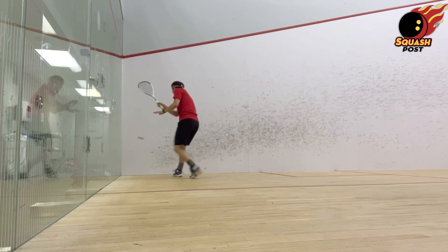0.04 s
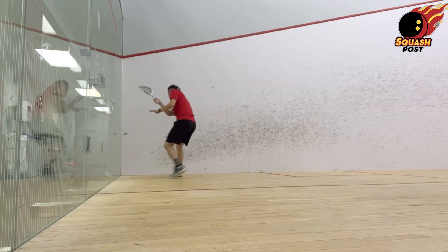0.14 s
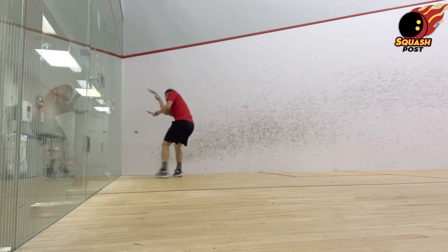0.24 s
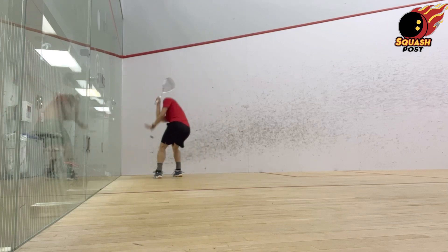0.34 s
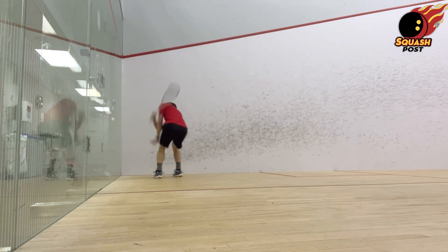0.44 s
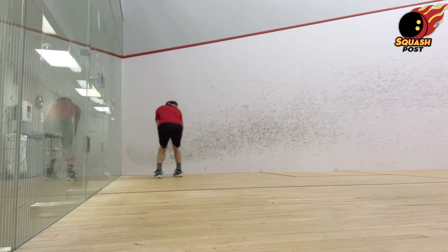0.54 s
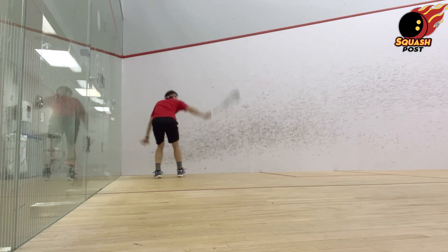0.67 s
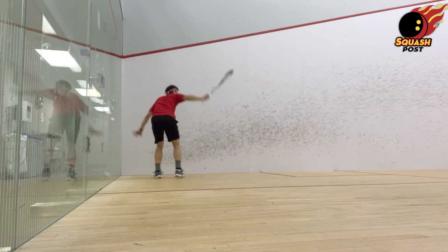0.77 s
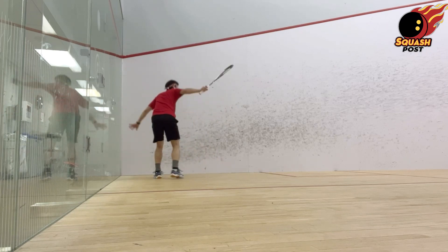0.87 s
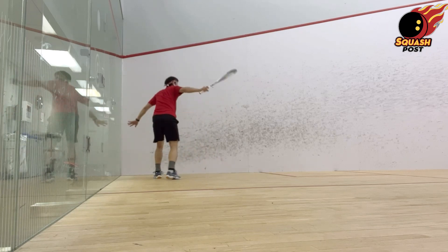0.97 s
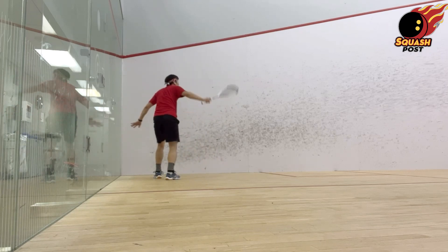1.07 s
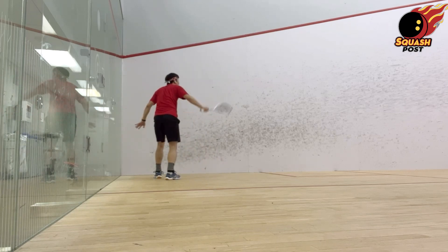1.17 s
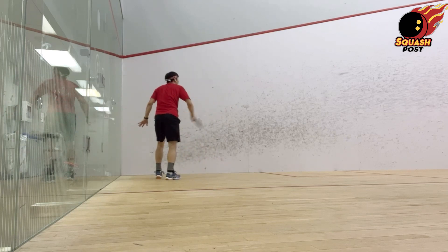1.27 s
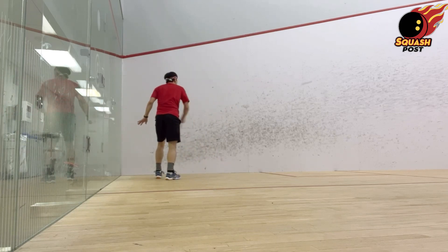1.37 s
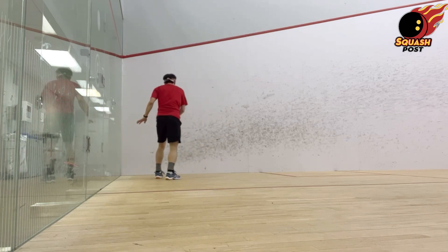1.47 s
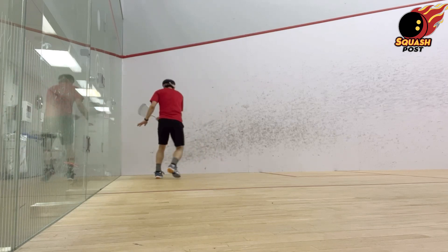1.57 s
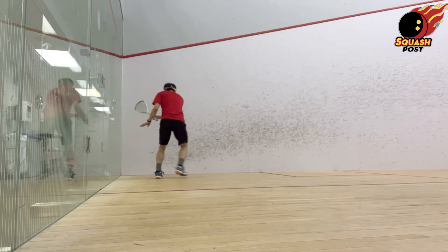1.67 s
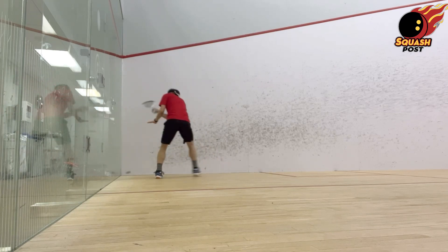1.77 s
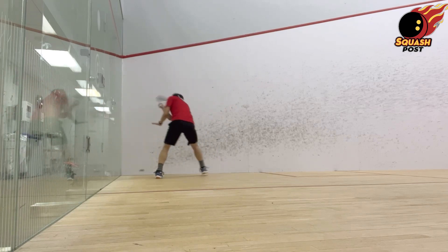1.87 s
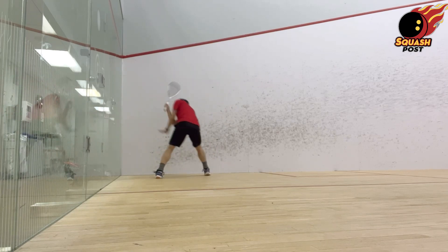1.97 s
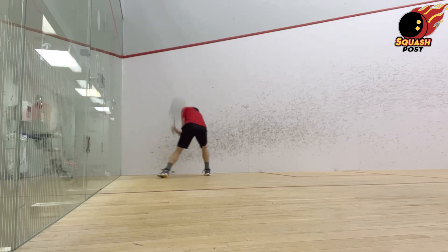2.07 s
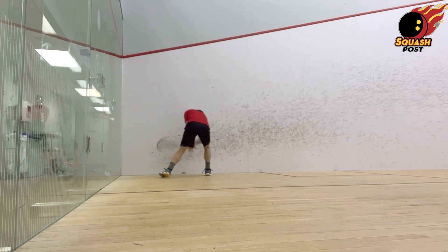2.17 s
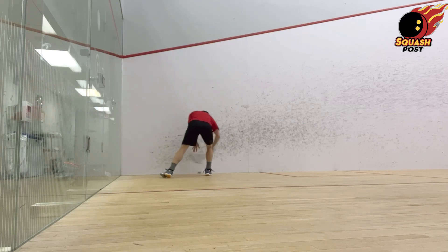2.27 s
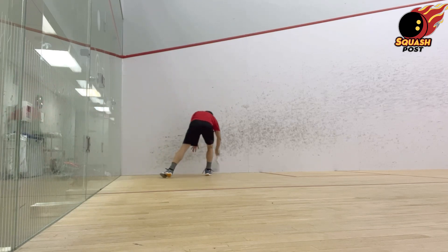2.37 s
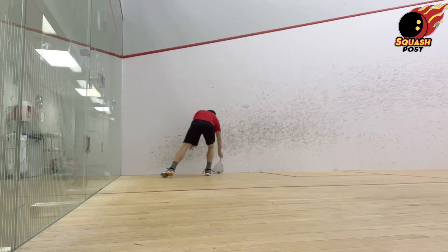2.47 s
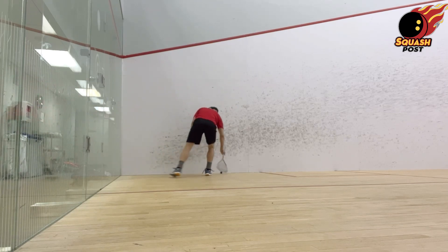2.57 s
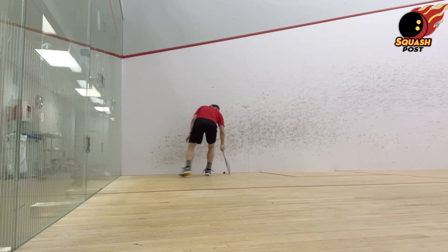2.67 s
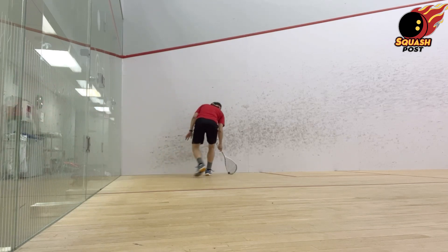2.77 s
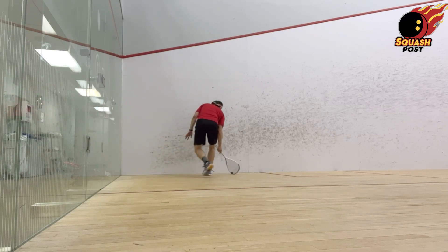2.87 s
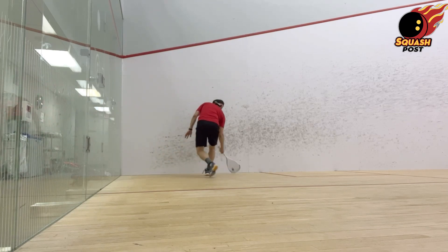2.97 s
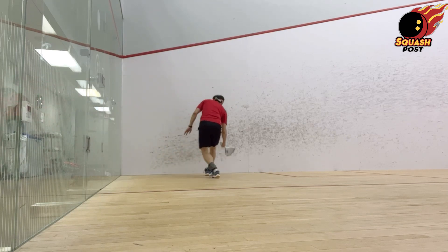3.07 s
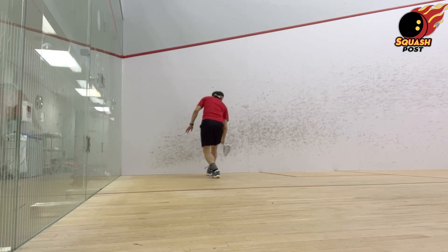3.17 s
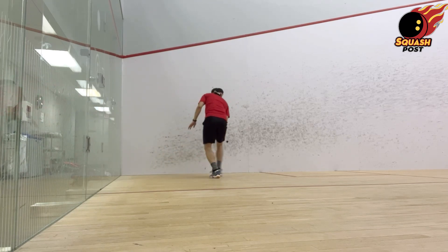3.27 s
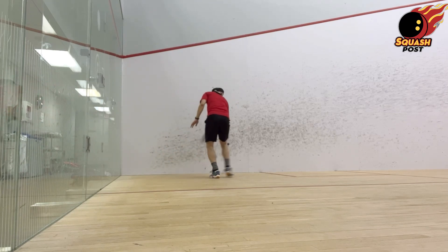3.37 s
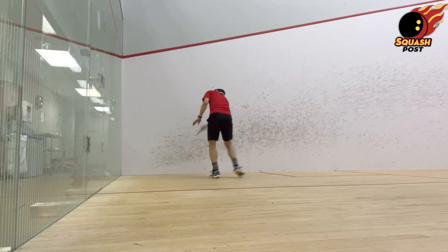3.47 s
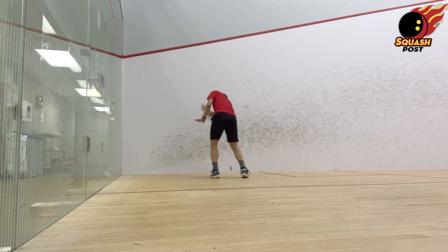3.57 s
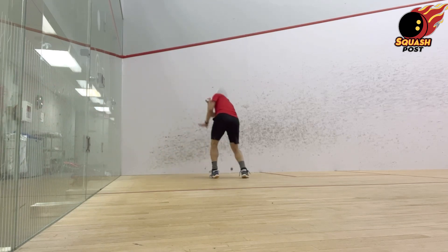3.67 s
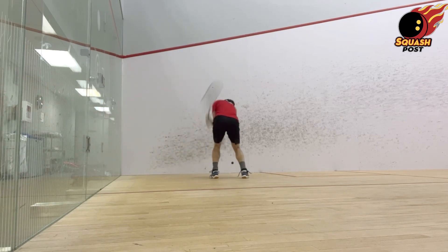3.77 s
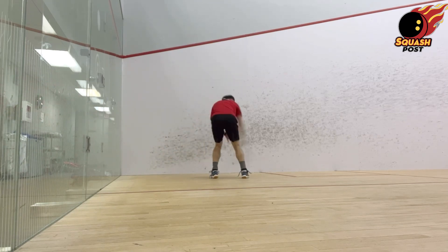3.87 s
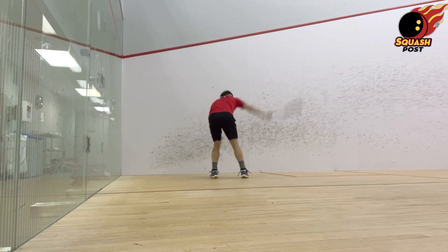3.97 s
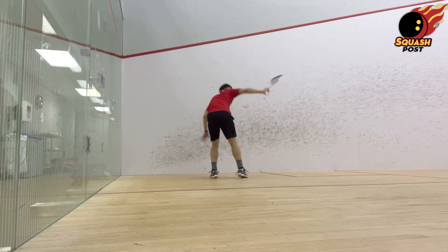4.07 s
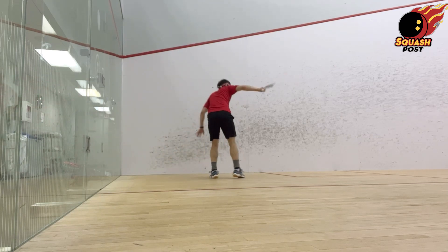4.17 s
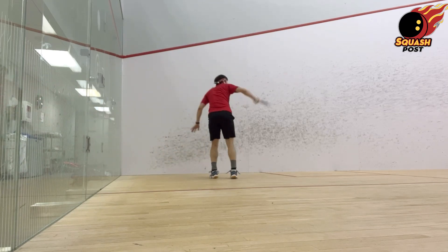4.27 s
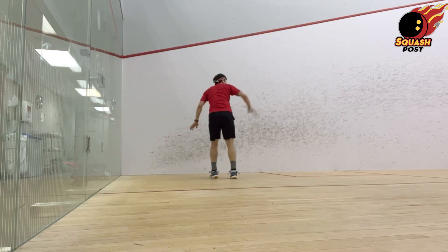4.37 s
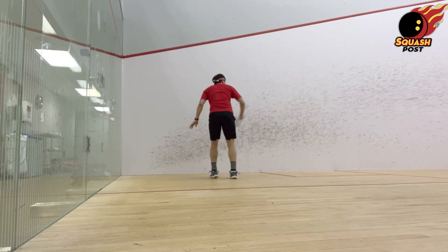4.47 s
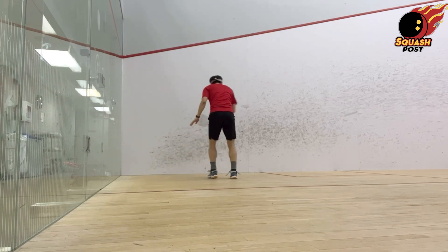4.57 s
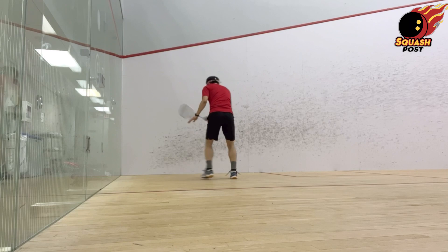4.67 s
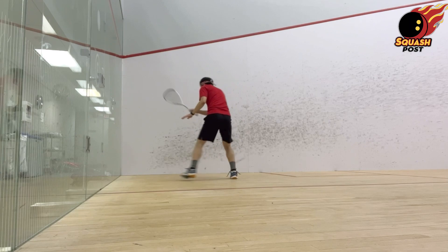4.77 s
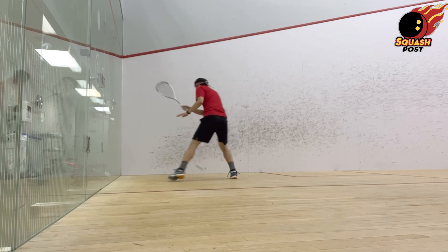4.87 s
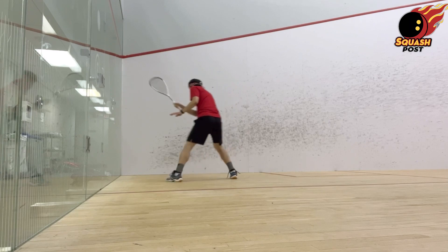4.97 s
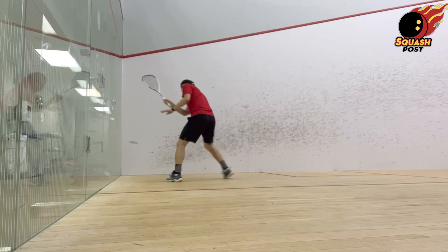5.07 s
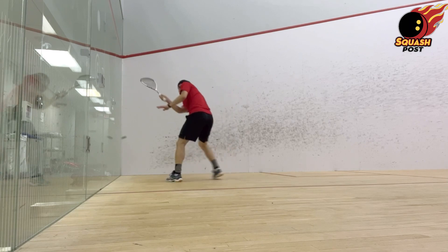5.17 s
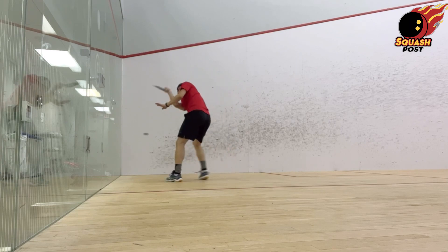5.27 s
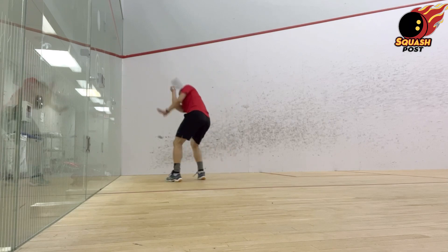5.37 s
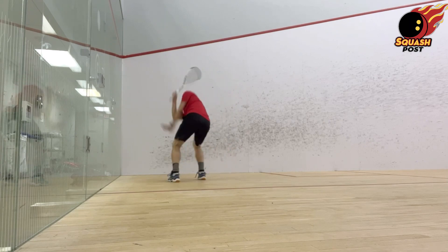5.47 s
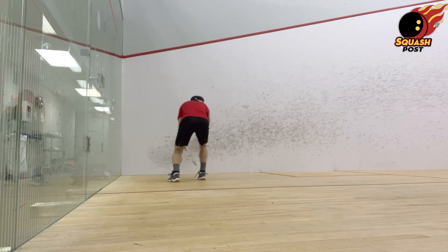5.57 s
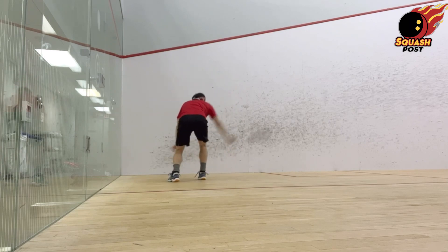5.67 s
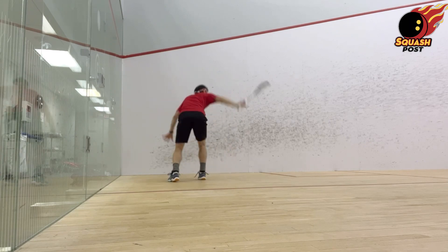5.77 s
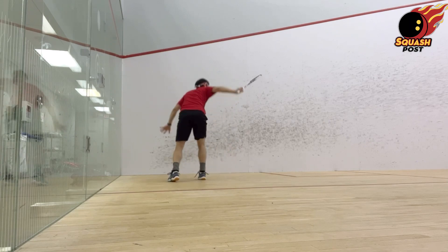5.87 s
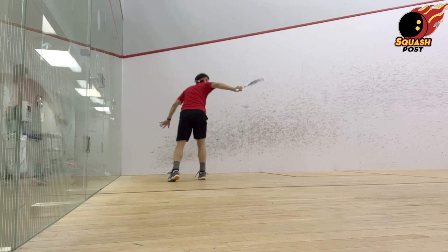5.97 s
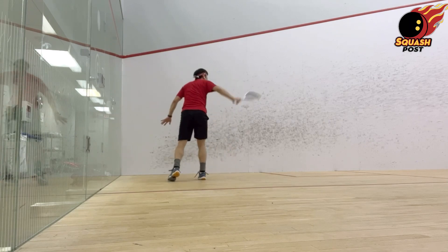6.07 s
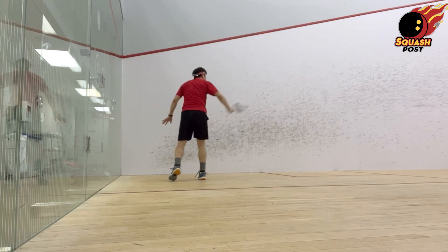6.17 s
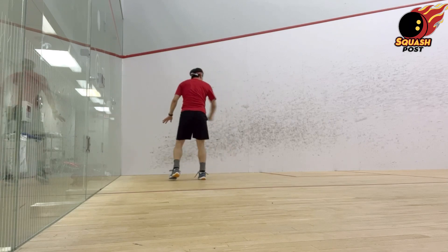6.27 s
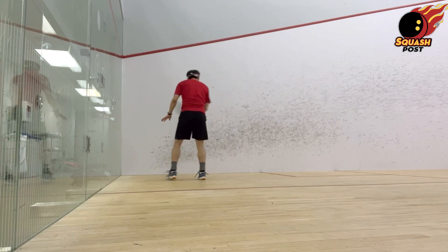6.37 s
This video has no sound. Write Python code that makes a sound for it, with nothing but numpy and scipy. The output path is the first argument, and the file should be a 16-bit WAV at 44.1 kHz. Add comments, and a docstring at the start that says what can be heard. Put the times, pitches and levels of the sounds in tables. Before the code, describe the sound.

Racket strokes swish and ring, the ball smacks the far wall, and footfalls and bounces fill the gaps in a hard, reverberant squash court.

```python
"""Squash rally indoors

A player drives a squash ball on an indoor court, heard from the back corner.
Each stroke swishes, cracks and rings the strings; the ball smacks the front wall and the bare court rings on.
Bounces, footfalls, shoe scuffs and brief hollow swells come between, over faint air noise. Bursts of filtered
random clicks make the cracks, taps, scuffs and swells, damped sine waves the ringing, fading noise the echo.
The recorder cuts the bass, gates fading sound, narrows the treble and clips peaks above full scale."""
import sys
import numpy as np
from scipy import signal
from scipy.io import wavfile
from scipy.ndimage import uniform_filter1d

SR = 44100
rng = np.random.default_rng(int(sys.argv[2]) if len(sys.argv) > 2 else 0)


def dump(signal):
    """Clip the signal to [-1, 1] and save it as 16-bit WAV at the path in sys.argv[1]."""
    limited = np.clip(np.atleast_2d(signal).T, -1, 1)
    pcm = np.round(limited * 32767).astype(np.int16)
    wavfile.write(sys.argv[1], SR, pcm)


N = 283563  # length of the scene in samples

# Levels of short sounds compare their energy with 10 ms at full scale; "base" levels get a fixed offset later.
# racket strokes: t/s, crack level/dB, strings level/dB, string pitch factor, boost of low string modes/dB,
# ball pop level/dB, side wall level/dB, early reflections base level/dB, swish level/dB,
# echo base level/dB, echo bass boost/dB, echo middle boost/dB
STROKES = [ (0.3517, -21, -11.5, 1.005, -5.5, -31.5, -27, -18.5, -25, -36, -4, 6),
           (2.1835, -12, -19.5, 1.1, 3, -21.5, -32.5, -23, -42.5, -29.5, -14.5, -14),
           (3.6572, -17.5, -10.5, 1.01, 0.5, -28, -35.5, -18.5, -28.5, -35.5, 11.5, 7),
           (5.3866, -14.5, -19.5, 1.02, 13.5, -39, -20.5, -18, -22, -32.5, 9.5, -1.5)]
# ball on the front wall: t/s, crack level/dB, pop f/Hz, scatter level/dB, boom f/Hz, boom delay/s,
# boom level/dB, echo bass and middle boost/dB
SMACKS = [ (0.5870, -13.5, 593.5, -24, 623, 0.0095, -19.5, 1),
          (3.8650, -12.5, 2332, -15.5, 730, .022, -16.5, 3),
          (5.6059, -10, 2570, -14.5, 900, 0.024, -12, 3.15)]
# ball on floor, glass and side wall: t/s, tap level/dB, tap hold/s, thump level/dB, hollow note f/Hz,
# note base level/dB, rumble level/dB, rumble hold/s
BOUNCES = [ (1.5369, -24.5, 0.0011, -28, 1770, -27.5, -32.5, .17),
           (2.2147, -18, .003, -39, 1597, -18, -40.5, 0.018),
           (2.401, -27.5, 0.0023, -57, 990, -31, -41, 0.024),
           (2.659, -34, 0.039, -48, 1800, -37, -36, 0.057),
           (3.399, -45.5, 0.00087, -78, 1700, -63, -74.5, .01),
           (4.622, -22, 0.0073, -48, 2420, -19.5, -29.5, 0.183),
           (4.915, -37, 0.0079, -63, 720, -36, -49, 0.055),
           (6.32, -36, 0.0058, -46.5, 1600, -45, -26.5, 0.17)]
# footfalls on the sprung floor: t/s, base level/dB, roll from heel to sole/s
STEPS = [(0.05, -58, .01), (1.263, -42, 0.0071), (1.459, -46.5, 0.011), (1.783, -43, 0.007),
         (2.029, -40, 0.057), (2.915, -54.5, 0.018), (3.473, -45.5, 0.063), (4.563, -34.5, 0.051),
         (6.199, -31, .1)]
# shoe scuffs: t/s, level/dB, f/Hz
SCUFFS = [(0.066, -40, 4210), (1.619, -44.5, 3680), (1.651, -43, 4650), (2.878, -45, 3180),
          (3.542, -41, 3730)]
# brief hollow swells in a narrow band: t/s, nominal length/s, f/Hz, base level/dB
SWELLS = [(0.806, 0.096, 733, -26.5), (0.961, 0.066, 810, -26.5), (1.053, 0.027, 713, -29),
          (2.543, 0.019, 1800, -44), (4.031, 0.074, 895, -23.5), (4.158, 0.023, 1540, -31.5),
          (4.974, 0.048, 686, -34.5)]
# modes of the strung racket, before pitch factor and boost: f/Hz, relative level/dB, time to fade 60 dB/s
RACKET_MODES = [(250, -12.5, 0.15), (582, -17.5, 0.025), (780, -8.5, 0.021), (1136.5, 2.5, 0.032),
                (1332, -14.5, 0.063), (1852, -8, .04), (2390, -20.5, .03), (3310, -9.5, .025),
                (3570, -17, 0.031)]

# tone colours, of which only the shape counts: f/Hz, relative level per Hz/dB
CRACK_TONE = [(60, -38.5), (250, -9), (1300, 1.5), (2100, -23.5), (2800, -8), (3300, -1), (3800, 8.5),
              (4500, -3), (5500, -3), (6500, 0.5), (7600, -24.5)]  # ball on strings
SMACK_TONE = [(60, -27.5), (300, -19), (700, -9.5), (1300, -1), (1900, -8.5), (2600, -22.5), (3100, 3),
              (3550, 5.5), (4400, 4), (5500, -2), (6600, -7.5), (7600, -9.5)]  # ball on front wall
SCATTER_TONE = [(50, -35), (120, -20), (250, 2.5), (450, -3), (1000, 1), (1700, -9), (2400, 0),
                (4500, -2.5), (6500, -14), (7600, -24)]  # sound scattered off the walls
TAP_TONE = [(100, -24.5), (1000, -25), (2700, -14.5), (3300, 2.5), (4000, -0.5), (4700, -10.5),
            (6300, -12.5), (7600, -28)]  # rubber on floor or wall
SWISH_TONE = [(80, -19), (280, 8), (700, -8.5), (1500, 0.5), (2600, -4.5), (3600, 3.5), (5000, 0),
              (6500, -5.5), (7600, -23.5)]  # racket through the air
CLATTER_TONE = [(60, -39.5), (150, -7.5), (280, 0.5), (520, -11.5), (800, 1), (980, -4), (1160, -1),
                (1450, -8), (1900, 2), (2300, -17.5), (2700, -14), (3600, -18.5), (6000, -23.5),
                (7600, -36.5)]  # blow thrown back by the near walls
ECHO_TONE = [(40, -38.5), (90, -29.5), (155, -11.5), (300, 4.5), (440, -12), (800, -13), (1900, -13),
             (2830, -17.5), (3120, 3.5), (3800, 5), (4700, 0.5), (5600, -6), (6700, -10.5), (7700, -30)]  # ringing court, and the flutter
AIR_TONE = [(30, -11.5), (80, -15), (140, 6), (250, -0.5), (500, -7.5), (800, -1), (1200, -2), (2000, -1.5),
            (3500, -8), (5500, -0.5), (7500, -16)]  # air noise of the hall
# how long the court rings: f/Hz, time to fade 60 dB/s
RING_TIMES = [(80, 1.6), (200, 1.65), (700, 4.35), (1300, 3.77), (2400, 3.21), (3600, 2.354), (5000, 2.19),
              (7000, 1.295)]
# noise gate threshold: f/Hz, level per Hz/dB
GATE_AT = [(200, -75.5), (3200, -72.5), (3800, -74.5), (4700, -75), (5500, -78.5), (7000, -89.5)]
# noise gate depth: f/Hz, greatest cut/dB
GATE_CUT = [(100, 9.4), (300, 3), (450, 3), (2700, 2.7), (3200, 16), (4000, 19), (5000, 19), (7000, 20)]

AIR_DB = -64
# echo levels: wall echo against its crack, bounce echo against the note's base level
SMACK_ECHO_DB, BOUNCE_ECHO_DB = -10, -17.5
EARLIER_SMACK_S, EARLIER_ECHO_DB = -1.2, -24  # the court still rings from the previous shot
BOARD_HZ = 204  # note of the floorboards
RUMBLE_HZ, RUMBLE_SAG_DB_PER_S = 184.4, 30.5  # the struck panel rumbles on, slowly sinking
POP_DB = -2.5  # wall pop against its crack
ROUND_TRIP_S = .057  # from the front wall to the back glass and home again
FLUTTER_DB, FLUTTER_LOSS_DB = -1.5, 3  # start level against the crack, then the loss on each trip
FLUTTER_S, FLUTTER_SPREAD_S = 0.013, 0.0039  # start hold of a return, then its growth on each trip
# the foot is planted just before the blow: lead, base level against the swish, note
PLANT_LEAD_S, PLANT_DB, PLANT_HZ = 0.041, -15, 253.6
CRACK_S = 0.0014  # the ball stays on the strings this long
FRAME_HZ = 950  # a blow off the centre of the strings brings out the modes below this
BALL_HZ = 2320  # the hollow ball pops as it is squashed
SIDE_WALL_S, SIDE_WALL_HZ = .011, 1159  # the near side wall throws back the middle of the ring
RETURN_S, RETURN_DB = .119, -18.5  # the ring comes back from the front wall, weaker than the first ring
WALLS_LOSS_DB_PER_S = 104.5  # the early reflections weaken as their paths lengthen
BAND_HZ, EDGE_HZ = 7550, 16000  # treble limits before and after the overload

HZ = np.fft.rfftfreq(2048, 1 / SR)  # pitch grid for tone colours
T = np.arange(SR // 4) / SR  # clock of one short sound, in seconds


def amp(db):
    """Turns decibels into a gain."""
    return 10 ** (np.asarray(db) / 20)


def read(points, hz=HZ):
    """Joins table rows by straight lines on a log-frequency axis."""
    f, value = np.transpose(points)
    return np.interp(np.log(hz + 1), np.log(f + 1), value)


def hump(hz, octaves):
    """Gives the spectrum in dB of one broad resonance."""
    distance = np.log2((HZ + 1) / hz) / octaves
    return -20 * np.log10(1 + distance ** 4)


def at_level(x, db):
    """Scales a sound to the energy of 10 ms at the given level."""
    return amp(db) * x * np.sqrt(.01 * SR / (np.sum(x ** 2) + 1e-20))


def add(mix, s, sound):
    """Mixes a sound in from time s, which may lie before the start."""
    start = round(s * SR)
    sound = sound[max(-start, 0):]
    part = mix[max(start, 0):][:len(sound)]
    part += sound[:len(part)]


def colour(x, db):
    """Filters a sound to the given spectrum, with unit filter energy and no sound ahead of its cause."""
    log_gain = np.log(amp(np.maximum(db, db.max() - 80)))
    mirrored = np.r_[log_gain, log_gain[-2:0:-1]]
    # this choice of phase makes the filter start at once
    taps = np.fft.ifft(np.exp(np.conj(signal.hilbert(mirrored)))).real
    return signal.fftconvolve(x, taps / np.linalg.norm(taps))[:len(x)]


def envelope(rise, hold, t60):
    """Rises, holds, then dies by 60 dB in t60 (hold counts from the start)."""
    return np.minimum(T / rise, 1) * amp(-60 * np.maximum(T - hold, 0) / t60)


def ragged(shape, depth_db):
    """Roughens an envelope: reflections arrive in clumps of a millisecond or two."""
    clumps = uniform_filter1d(rng.standard_normal(len(shape)), size=80)
    return shape * amp(depth_db * clumps / clumps.std())


def burst(spectrum, db, shape):
    """Makes a cluster of wavelets of random sign under an envelope."""
    clicks = shape * rng.choice([-1., 1.], len(shape))
    return at_level(colour(clicks, spectrum), db)


def thump(hz, db, rise, t60):
    """Makes one low damped swing."""
    return at_level(np.sin(2 * np.pi * hz * T) * envelope(rise, rise, t60), db)


def step(db, hz, roll):
    """The heel pushes the boards, which rumble while the foot rolls onto the sole."""
    heel = thump(hz, db - 4, rise=0.0073, t60=0.026)
    boards = burst(hump(hz, octaves=.45), db - 4, envelope(rise=.006, hold=roll, t60=0.075))
    return heel + boards


def echo(sources, build=.07):
    """Each blow (s, dB, bass dB, middle dB) feeds the diffuse field, where each band dies at its own speed."""
    hz = np.fft.rfftfreq(512, 1 / SR)
    t = np.arange(N // 256 + 3) * 256 / SR
    s, db, bass_db, middle_db = np.transpose(sources)
    age = np.maximum(t[:, None] - s, 0)
    fed = np.minimum(age / build, 1) ** 2 * amp(2 * db)  # doubled dB: power, not amplitude
    low = 1 / (1 + (hz / 420) ** 4)
    below_treble = 1 / (1 + (hz / 2900) ** 16)
    body = amp(2 * (np.outer(bass_db, low) + np.outer(middle_db, below_treble - low)))
    rate = 2 * np.log(1000) / read(RING_TIMES, hz)
    # each blow decays from its own time
    power = (fed @ (body * np.exp(s[:, None] * rate))) * np.exp(-t[:, None] * rate)
    tone = amp(read(ECHO_TONE, hz))
    noise = signal.stft(rng.standard_normal(N + SR), nperseg=512)[2][:, :len(t)]
    gain = (np.sqrt(power) * tone).T / np.sqrt(np.mean(tone ** 2))
    return signal.istft(noise * gain)[1][:N]


def hall_air():
    """Faint steady air noise of the hall: filtered random noise."""
    # the first second is dropped, so the filter has settled
    return amp(AIR_DB) * colour(rng.standard_normal(N + SR), read(AIR_TONE))[SR:]


def court():
    """Strokes, smacks and bounces all ring on in the bare room; the soft bounces ring hollower."""
    strokes = [(s, db, bass_db, middle_db) for s, *_, db, bass_db, middle_db in STROKES]
    smacks = [(s, crack_db + SMACK_ECHO_DB, body_db, body_db) for s, crack_db, *_, body_db in SMACKS]
    landings = [(s, note_db + BOUNCE_ECHO_DB, -14, 5) for s, _, _, _, _, note_db, _, _ in BOUNCES]
    earlier = [(EARLIER_SMACK_S, EARLIER_ECHO_DB, 0, 0)]
    return echo(strokes + landings, build=0.076) + echo(earlier + smacks, build=.08)


def swells():
    """Short hollow swells: narrow-band bursts that rise over half their nominal length, then die away."""
    out = np.zeros(N)
    for s, length, hz, db in SWELLS:
        shape = envelope(rise=length / 2, hold=length * 0.94, t60=0.11)
        add(out, s, burst(hump(hz, octaves=0.26), db + 0.5, shape))
    return out


def scuffs():
    """A rubber sole drags briefly on the varnish: a burst around one high pitch."""
    out = np.zeros(N)
    for s, db, hz in SCUFFS:
        shape = envelope(rise=0.0055, hold=.012, t60=0.12)
        add(out, s, burst(hump(hz, octaves=0.31), db, shape))
    return out


def footfalls():
    """The player's feet shift between strokes and sound the floorboards."""
    out = np.zeros(N)
    for s, db, roll in STEPS:
        add(out, s, step(db, BOARD_HZ, roll))
    return out


def bounces():
    """A softer landing: a rubber tap, the panel's thump and rumble, a hollow note scattered off the walls."""
    out = np.zeros(N)
    for s, tap_db, tap_s, thump_db, hz, note_db, rumble_db, rumble_s in BOUNCES:
        add(out, s, burst(read(TAP_TONE), tap_db, envelope(rise=0.0026, hold=tap_s, t60=.035)))
        add(out, s, thump(255, thump_db, rise=0.0051, t60=0.036))

        rumble = envelope(rise=.012, hold=rumble_s, t60=.1) * amp(-RUMBLE_SAG_DB_PER_S * T)
        add(out, s, burst(hump(RUMBLE_HZ, octaves=0.52), rumble_db, rumble))

        note = ragged(envelope(rise=0.00033, hold=0.011, t60=0.21), depth_db=6.5)
        add(out, s, burst(hump(hz, octaves=0.41), note_db - 3.5, note))
        scatter = ragged(envelope(rise=.001, hold=.008, t60=.22), depth_db=6.5)
        add(out, s, burst(read(SCATTER_TONE), note_db - 8, scatter))
    return out


def front_wall():
    """The ball flattens with a crack and a pop, the wall booms, the crack flutters between the end walls."""
    out = np.zeros(N)
    for s, crack_db, pop_hz, scatter_db, boom_hz, delay, boom_db, _ in SMACKS:
        contact = envelope(rise=0.00092, hold=0.0012, t60=0.016)
        add(out, s, burst(read(SMACK_TONE), crack_db, contact))
        pop = contact * np.sin(2 * np.pi * pop_hz * T)
        add(out, s, at_level(pop, crack_db + POP_DB))

        scatter = ragged(envelope(rise=0.002, hold=0.011, t60=0.2), depth_db=0.5)
        add(out, s + 0.0022, burst(read(SCATTER_TONE), scatter_db, scatter))

        boom = envelope(rise=0.0017, hold=0.018, t60=0.11)
        add(out, s + delay, burst(hump(boom_hz, octaves=0.6), boom_db, boom))
        low_boom = envelope(rise=0.005, hold=0.01, t60=0.14)
        add(out, s + 0.0034, burst(hump(233, octaves=0.52), boom_db - 6.5, low_boom))

        for trip in range(1, 4):
            hold = FLUTTER_S + FLUTTER_SPREAD_S * trip
            flutter = ragged(envelope(rise=0.0024, hold=hold, t60=.025), depth_db=1.5)
            flutter_db = crack_db + FLUTTER_DB - FLUTTER_LOSS_DB * trip
            add(out, s + trip * ROUND_TRIP_S, burst(read(ECHO_TONE), flutter_db, flutter))
    return out


def string_ring(pitch, frame_db):
    """The strung racket rings: damped sine waves, the low ones boosted by frame_db."""
    ring = np.zeros(len(T))
    for hz, db, t60 in RACKET_MODES:
        level = amp(db + frame_db * (hz < FRAME_HZ))
        ring += level * np.sin(2 * np.pi * hz * pitch * T) * envelope(rise=0.00067, hold=0.0076, t60=t60)
    return ring


def racket():
    """The foot plants and the head swishes; the blow cracks, rings the strings and clatters off the near walls."""
    out = np.zeros(N)
    for (s, crack_db, strings_db, pitch, frame_db, pop_db,
         side_db, early_db, swish_db, *_) in STROKES:
        add(out, s - PLANT_LEAD_S, step(swish_db + PLANT_DB, PLANT_HZ, roll=.014))
        swish = envelope(rise=0.06, hold=0.042, t60=0.026)
        add(out, s - .031, burst(read(SWISH_TONE), swish_db, swish))

        crack = ragged(envelope(rise=0.002, hold=CRACK_S, t60=.042), depth_db=-0.5)
        add(out, s - .001, burst(read(CRACK_TONE), crack_db, crack))
        strings = string_ring(pitch, frame_db)
        add(out, s, at_level(strings, strings_db))
        pop = envelope(rise=.001, hold=.004, t60=0.057)
        add(out, s, burst(hump(BALL_HZ, octaves=0.31), pop_db, pop))

        side = envelope(rise=.003, hold=0.013, t60=.04)
        add(out, s + SIDE_WALL_S, burst(hump(SIDE_WALL_HZ, octaves=.35), side_db, side))
        add(out, s + RETURN_S, at_level(strings, strings_db + RETURN_DB))

        fading = envelope(rise=.008, hold=.095, t60=0.69) * amp(-WALLS_LOSS_DB_PER_S * T)
        walls = ragged(fading, depth_db=4)
        add(out, s + .006, burst(read(CLATTER_TONE), early_db - 4.5, walls))
        # part of the ring comes back with its pitch intact
        reflections = walls * rng.standard_normal(len(T))
        pitched = signal.fftconvolve(strings * amp(-700 * T), reflections)
        add(out, s + 0.0054, at_level(pitched, early_db - 6))
    return out


def scene():
    """The rally over the faint air noise of the hall, as one channel."""
    background = hall_air() + court() + swells()
    feet = scuffs() + footfalls()
    ball = bounces() + front_wall()
    return (background + feet + ball + racket())[None]


def gate(x, knee_db=6.0):
    """Turns down each band as its own smoothed level sinks under the threshold."""
    hz, _, z = signal.stft(x, SR, nperseg=512, scaling="psd")
    over_time = uniform_filter1d(2 * abs(z) ** 2, size=4, axis=-1)
    density = uniform_filter1d(over_time, size=11, axis=-2)  # smoothed across bands too
    under_db = read(GATE_AT, hz)[:, None] - 10 * np.log10(abs(density) + 1e-20)
    cut_db = read(GATE_CUT, hz)[:, None] * np.clip(under_db / knee_db, 0, 1)
    return signal.istft(z * amp(-cut_db), SR, scaling="psd")[1][:, :N]


def low_pass(x, hz):
    """Removes treble steeply, delaying all pitches alike."""
    taps = signal.firwin(255, hz, window=("kaiser", 9), fs=SR)
    return signal.oaconvolve(x, taps[None], "same")


def record(dry, low_cut_hz=85):
    """Bass cut, noise gate, narrow treble, overload at full scale, then the band limit."""
    thin = signal.sosfilt(signal.butter(2, low_cut_hz, "high", fs=SR, output="sos"), dry)
    narrow = low_pass(gate(thin), BAND_HZ)
    return low_pass(np.clip(narrow, -1, 1), EDGE_HZ)


dry = scene()
out = record(dry)
dump(out)
```